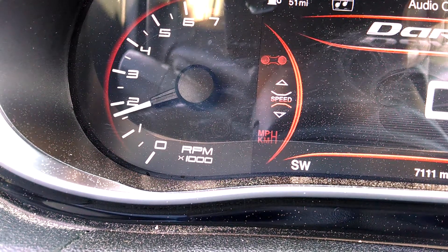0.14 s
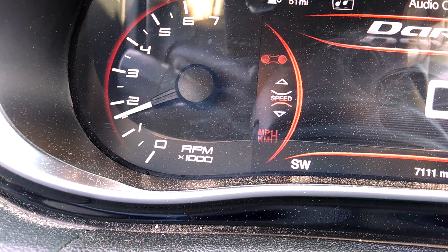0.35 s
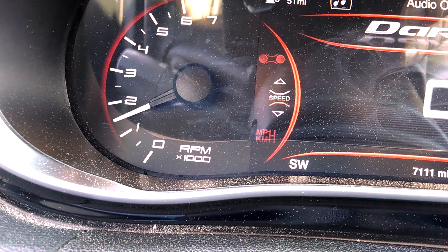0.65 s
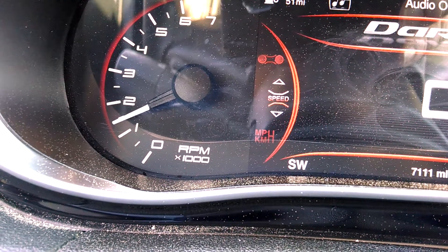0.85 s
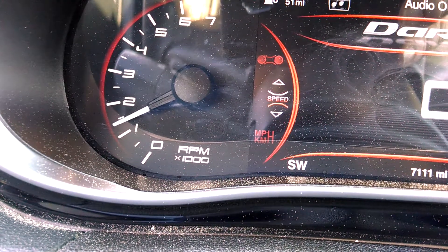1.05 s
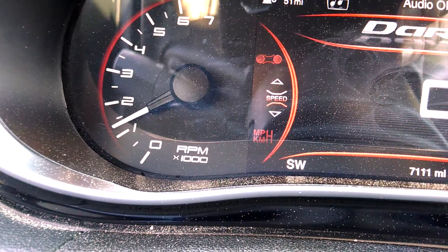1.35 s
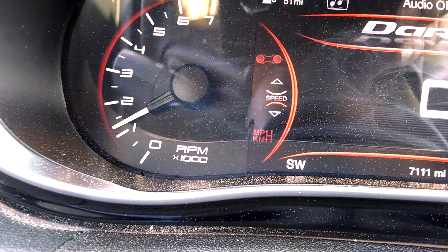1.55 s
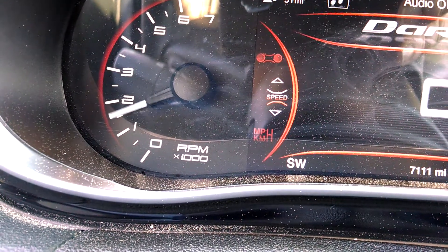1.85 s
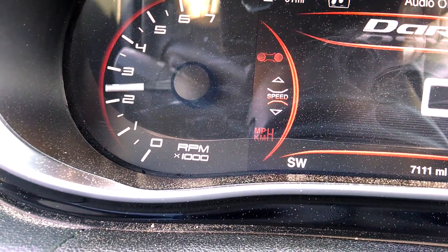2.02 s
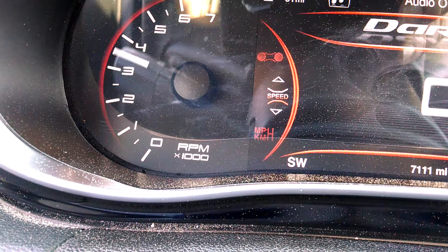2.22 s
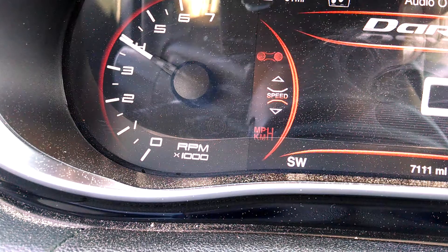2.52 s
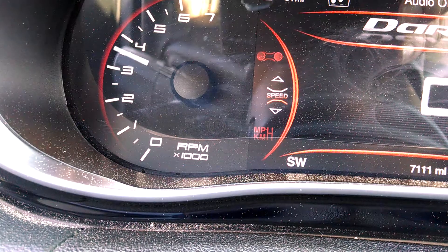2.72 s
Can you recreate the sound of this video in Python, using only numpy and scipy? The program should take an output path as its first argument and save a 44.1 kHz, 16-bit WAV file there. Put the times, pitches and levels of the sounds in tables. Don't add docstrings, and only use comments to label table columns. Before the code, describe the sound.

A four-cylinder car engine idles low, surges upward, and releases a sharp puff of turbo air

```python
import sys
import numpy as np
from scipy import signal
from scipy.fft import rfft, irfft, next_fast_len
from scipy.io import wavfile
from scipy.ndimage import map_coordinates

SR = 44100
rng = np.random.default_rng(int(sys.argv[2]) if len(sys.argv) > 2 else 0)


def volts_from_db(level):
    exponent = np.asarray(level, float) / 20
    return 10 ** exponent


def unload_audio(sound):
    columns = np.transpose(np.atleast_2d(sound))
    steps = np.round(np.clip(columns, -1, 1) * 32767)
    wavfile.write(sys.argv[1], SR, steps.astype(np.int16))


N = 127008
T_S = np.arange(N) / SR

# (frequency [Hz], level [dB])
PORT_DIFFERENCE = [(100, -29), (400, -11.5), (800, -6), (1500, 3), (3000, -1), (12000, 0)]
# (frequency [Hz], level [dB])
LEFT_TREBLE = [(5000, -0.13), (9000, -0.5), (14000, -3)]

# (frequency [Hz], level [dB])
BLOWER_SPECTRUM = [(1500, -8), (4000, 3), (9000, -1), (12000, -6), (15000, -15)]
# (frequency [Hz], level [dB])
INTAKE_SPECTRUM = [(1000, 6.5), (2500, 1), (4000, -3.5), (7000, -2), (9500, -7.5), (11500, -16.5),
                   (14500, -37), (15500, -22)]
# (frequency [Hz], level [dB])
HOUSING_SPECTRUM = [(600, -24), (760, 2.5), (850, 2.5), (950, -14), (1300, -33.5)]
TONE_HZ = [9775, 12986, 7130, 3135]
TONE_DB = [-64.5, -81, -80, -81]

# (frequency [Hz], level [dB])
RUMBLE_SPECTRUM = [(15, -83), (30, 8), (100, 4), (200, -4), (400, -14.5), (800, -28.5), (1500, -83)]
# (time [s], level [dB])
DRAUGHT_LEVEL = [(0.0, -25), (1.0, -21.5), (1.4, -19), (2.2, -19), (2.45, -17), (2.88, -21)]
# (time [s], peak [dB], frequency [Hz], sharpness [dB])
EDDIES = [(0.07, -5, 135, -4), (0.359, -4.5, 84, -0.5), (0.708, -13, 81, -8), (0.823, -7.5, 80.12, 2.5),
          (0.983, -23.5, 71.6, 16.5), (1.102, -7, 94.5, 4.5), (1.15, -6.5, 95, 3.5), (1.208, -3, 115.8, 4),
          (1.253, -12, 43.4, 5), (1.354, -5.5, 89, 6), (1.504, -5.5, 120, 3.5), (1.554, -10, 65.1, 5),
          (1.668, -21, 82.5, 6), (1.739, -10, 70, 5), (1.984, -11.5, 134, 13.5), (2.1, -9, 92.88, 11),
          (2.16, -15, 113, 7), (2.204, -30, 124, 3), (2.304, -11, 96.1, -14), (2.367, -8, 138.6, -15),
          (2.477, -12.5, 94, 13.5), (2.537, -10.5, 102.9, 10.5), (2.639, -30, 100.2, 3),
          (2.756, -14, 96.9, 17),
          (2.127, -3.5, 103.3, 3), (.14, -21, 130, 10), (.48, -10.5, 100, -1), (0.917, -24, 97, -10),
               (1.284, -14, 172, -13), (2.308, -10.5, 50.4, -7)]

# (time [s], level [dB])
SQUEAKS = [(0.456, -56), (.76, -55), (1.059, -55), (1.4, -56)]
# (time [s], level [dB], length [s])
CHIRPS = [(.725, -63, .016), (.79, -66, .015), (.903, -67, .012), (1.3, -68, .012), (1.47, -64, .012),
          (1.58, -65, .016), (1.765, -66, .016)]
# (time [s], level [dB])
TAPS = [
    (1.149, -25.5),
    (1.208, -32),
    (1.751, -27),
    (2.307, -17),
]
# (frequency [Hz], level [dB])
TAP_SPECTRUM = [(100, -29), (400, 12), (900, -9), (2000, -20), (3000, -45)]

# (time [s], peak [dB], rise [s], fall T60 [s])
PUFFS = [
    (2.305, -36.5, 0.0078, 0.12),
    (2.348, -46, 0.03, 2.83),
    (2.123, -52, 0.32, 2.31),
]
# (frequency [Hz], level [dB])
VALVE_SPECTRUM = [(1200, -3), (3000, -1.5), (5000, -5.5), (7300, 2), (9000, -2), (12000, -10), (13500, -18),
                  (15000, -26)]
# (time [s], length [s], frequency [Hz], width [Hz], level [dB])
FLUTTER = [(2.316, 0.0074, 3300, 199.9, -45.5), (2.358, 0.013, 1360, 200.1, -42),
           (2.36, 0.01, 1850, 89, -42), (2.367, 0.0064, 3250, 250, -47), (2.386, 0.0059, 3130, 300, -47.5)]

# (time [s], firing rate [Hz], boom [dB], boom share off-centre [ratio], load [dB], air flow [dB])
ENGINE = [(0, 52.66, -36, 0.46, -40, -61.5), (.35, 48.45, -23.5, 0.27, -39.5, -59),
          (.55, 45.6, -30, 0.14, -40.5, -59), (.8, 43.62, -22.5, .15, -37.5, -55),
          (1.1, 41.21, -31, 0.18, -37, -53.5), (1.25, 39.5, -33.5, 0.13, -41.5, -59.5),
          (1.52, 37.55, -29, 0.22, -39.5, -56), (1.64, 40.77, -33, .4, -34.5, -55.5),
          (1.76, 62.04, -32, 0.21, -22.5, -51), (1.87, 80.81, -19.5, 0.23, -20.5, -48),
          (1.98, 102.1, -20.5, 0.92, -23.5, -51), (2.06, 117.9, -40, .5, -21.5, -49),
          (2.17, 137.4, -21, 0.89, -22.5, -45.5), (2.32, 136.4, -25, 0.82, -22.5, -45.5),
          (2.43, 128.5, -36.5, 0.4, -29, -48), (2.55, 120.3, -23, 0.13, -30, -47.5),
          (2.74, 111, -34, 0.68, -31, -48), (2.88, 100.1, -19.5, 0.51, -27.5, -47)]
# (time [s], level [dB])
EXHAUST_LEVEL = [(1.45, -55), (1.62, -37.5), (1.77, -25.5), (1.9, -30.5), (2.08, -29), (2.2, -29),
                 (2.4, -36), (2.6, -36), (2.88, -36.5)]
# (time [s], change [dB], length [s])
LOAD_SWINGS = [
    (2.018, -7, .02),
    (2.105, 2.5, .02),
    (2.275, -5, .014),
    (2.335, -5, .008),
]
CYLINDER_SIZES = [1.55, 0.38, 1.01, 0.97]
# (multiple of firing rate [ratio], level over exhaust level [dB])
EXHAUST_ORDERS = [(2, -1), (2.5, -10), (3, -2), (3.5, -11), (4, -7), (4.5, -6), (5, -8), (6, -3)]
# (multiple of firing rate [ratio], level over load [dB])
WHINE_ORDERS = [(11.35, -1), (10.85, -8), (11.85, -8), (7.9, -11), (5, -7), (6, -10), (2, -9)]
# (frequency [Hz], width [Hz], level [dB])
PANELS = [(238, 118, -4.5), (395.6, 32, 8), (539, 116, -2), (608.6, 37.6, 5.5), (829, 60, -4)]
# (frequency [Hz], level [dB])
CABIN = [(60, -32), (130, 2), (300, -4.5), (650, 1), (920, -20), (1030, -16.5), (2000, -35.5), (3500, -84)]


def unit(x):
    return x / np.sqrt(np.mean(x ** 2) + 1e-20)


def along(points, hz):
    f, v = np.transpose(points)
    return np.interp(np.log(hz + 1), np.log(f + 1), v)


def curves(rows):
    s, *columns = np.transpose(rows)
    return [np.interp(T_S, s, column) for column in columns]


def wobble(rate_hz):
    knots = rng.standard_normal(int(N * rate_hz / SR) + 4)
    return map_coordinates(knots, [np.arange(N) * rate_hz / SR])


def bump(s, length_s):
    return np.exp(-.5 * ((T_S - s) / length_s) ** 2)


def filtered(x, response):
    m = next_fast_len(N + SR // 2)
    return irfft(rfft(x, m) * response(np.fft.rfftfreq(m, 1 / SR)), m)[..., :N]


def peaks(table, f):
    total = 0
    for k, (hz, width_hz, db) in enumerate(table):
        total = total + (-1) ** k * volts_from_db(db) * 1j * f * width_hz / (hz * hz - f * f + 1j * f * width_hz)
    return total


def ports(mid, apart):
    return np.array([mid + apart, mid - apart])


def spread(f):
    return np.array([np.ones_like(f), volts_from_db(along(PORT_DIFFERENCE, f))])


def cross(hz):
    inverse_delay_hz, fade_hz = 2641, 11000
    share = 0.67 * np.exp(-hz / fade_hz)
    z = share * np.exp(-2j * np.pi * hz / inverse_delay_hz)
    makeup = np.where(hz < inverse_delay_hz / 2, np.abs(1 - z), 1 + share)
    return np.array([1 - z, 1 + z]) / makeup


def hiss(spectrum):
    noise = rng.standard_normal((2, N))
    mid, apart = filtered(noise, lambda f: volts_from_db(along(spectrum, f)) * spread(f))
    return ports(mid, apart) / np.std(mid)


def air():
    *_, load_db, flow_db = curves(ENGINE)
    intake_db, blower_db, housing_db = 2, -70, 6
    tones = 0
    for hz, db in zip(TONE_HZ, TONE_DB):
        phase = 2 * np.pi * hz * T_S + 0.21 * wobble(11)
        tones = tones + np.sqrt(2) * volts_from_db(db + 0.85 * wobble(6.7)) * np.sin(phase)
    tones = tones * volts_from_db([[-1.2], [1.2]] - 0.28 * (load_db - load_db.min()))
    intake = volts_from_db(flow_db + intake_db + 0.45 * wobble(14)) * hiss(INTAKE_SPECTRUM)
    blower = volts_from_db(blower_db) * hiss(BLOWER_SPECTRUM)
    housing = volts_from_db(np.minimum(flow_db, -54) + housing_db + 2 * wobble(9)) * hiss(HOUSING_SPECTRUM)
    return intake + blower + housing + tones


def draught():
    lumps_db, left_db, eddy_db, eddy_cycles = 3, 1, -3.5, 0.52
    core_db, core_pitch = -10, 2.28
    lumps = volts_from_db(lumps_db * np.array([wobble(16), wobble(14)]))
    rumble = filtered(rng.standard_normal((2, N)), lambda f: volts_from_db(along(RUMBLE_SPECTRUM, f)))
    out = volts_from_db(curves(DRAUGHT_LEVEL)[0]) * unit(lumps * rumble) * volts_from_db([[left_db], [-left_db]])
    for s, db, hz, sharp_db in EDDIES:
        cycles = (T_S - s) * hz
        phase = rng.uniform(0, 2 * np.pi)
        for pitch, gain in [(1, 1), (core_pitch, volts_from_db(core_db + sharp_db))]:
            envelope = np.exp(-.5 * (pitch * cycles / eddy_cycles) ** 2)
            wave = np.cos(2 * np.pi * pitch * cycles + phase)
            out[0] += 2 * volts_from_db(db + eddy_db) * gain * envelope * wave
    return filtered(out, lambda f: 1 / np.abs(cross(np.minimum(f, 600))[1]))


def squeaks():
    start_hz, fall_hz_per_s, length_s = 2550, 6000, 0.018
    out = 0
    for s, db in SQUEAKS:
        late_s = T_S - s
        turns = (start_hz - fall_hz_per_s * late_s / 2) * late_s
        out = out + volts_from_db(db) * bump(s, length_s) * np.sin(2 * np.pi * turns)
    return out * volts_from_db([[3], [-9]])


def chirps():
    swell = sum(volts_from_db(db) * bump(s, length_s) for s, db, length_s in CHIRPS)
    return np.sqrt(2) * swell * np.sin(2 * np.pi * 7140 * T_S + 1.6 * wobble(90))


def taps():
    noise = unit(filtered(rng.standard_normal(N), lambda f: volts_from_db(along(TAP_SPECTRUM, f))))
    return sum(volts_from_db(db) * bump(s, 0.0015) for s, db in TAPS) * noise


def turbo():
    peak_s, length_s, peak_hz, rise_hz_per_s, level_db = 2.14, .06, 10000, 24000, -67
    late_s = T_S - peak_s
    turns = (peak_hz + rise_hz_per_s * late_s / 2) * late_s
    return np.sqrt(2) * volts_from_db(level_db) * bump(peak_s, length_s) * np.sin(2 * np.pi * turns + 2 * wobble(150))


def valve():
    envelope = 0
    for s, db, rise_s, t60_s in PUFFS:
        fall = volts_from_db(db - 60 * np.maximum(T_S - s - rise_s, 0) / t60_s)
        envelope = envelope + fall * np.clip((T_S - s) / rise_s, 0, 1)
    noise = rng.standard_normal((2, N))
    flutter = 0
    for s, length_s, *ring in FLUTTER:
        flutter = flutter + filtered(noise * bump(s, length_s), lambda f: 12 * peaks([ring], f))
    mid, apart = flutter
    return envelope * volts_from_db(0.76 * wobble(31.1)) * hiss(VALVE_SPECTRUM) + ports(mid, .5 * apart)


def engine_body(hz, turn):
    scatter_db, jitter_periods, gate, noise_db = 1.5, .014, .6, -4
    throb, lope = .25, .12
    echo_t60_s, panel_db = 0.28, 6
    at = np.searchsorted(turn, np.arange(1, int(turn[-1])))
    late, size = rng.standard_normal((2, len(at)))
    place = np.clip(at + jitter_periods * late * SR / hz[at], 0, N - 1).astype(int)
    pulses = np.zeros(N)
    pulses[place] = np.resize(CYLINDER_SIZES, len(at)) * volts_from_db(scatter_db * size)
    pulses = unit(pulses / np.sqrt(hz))
    noise = rng.standard_normal((2, N)) * np.exp(gate * np.cos(2 * np.pi * turn))
    decay = volts_from_db(-60 * np.arange(SR // 4) / SR / echo_t60_s)
    tails = rng.standard_normal((2, SR // 4)) * decay
    echoed = unit(signal.fftconvolve(pulses[None], tails, axes=1)[:, :N])
    drive = echoed + volts_from_db(noise_db) * unit(noise)
    drive = drive * np.exp(throb * np.cos(2 * np.pi * turn) + lope * np.cos(np.pi * turn))

    def response(f):
        return volts_from_db(along(CABIN, f)) * (1 + volts_from_db(panel_db) * peaks(PANELS, f)) * spread(f)

    mid, apart = filtered(drive, response)
    return ports(mid, apart) / np.std(mid)


def belt_whine(hz, turn):
    low_hz, high_hz = 38, 60
    present = np.clip(np.minimum((high_hz - hz) / 7, (hz - low_hz) / 4), 0, 1)
    out = 0
    for k, db in WHINE_ORDERS:
        out = out + volts_from_db(db + wobble(8)) * present * np.sin(2 * np.pi * k * turn + .25 * wobble(12))
    return out * volts_from_db([[.8], [-.8]])


def exhaust_strands(hz, turn):
    out = 0
    for k, db in EXHAUST_ORDERS:
        level_db = db + 3.2 * wobble(17) + np.minimum(along(CABIN, k * hz), 0)
        out = out + volts_from_db(level_db) * np.sin(2 * np.pi * k * turn + .55 * wobble(17))
    return out * volts_from_db([[.8], [-.8]])


def engine():
    hz, boom_db, share, load_db, _ = curves(ENGINE)
    turn = np.cumsum(hz) / SR
    swing_db = sum(db * bump(s, length_s) for s, db, length_s in LOAD_SWINGS)
    angle = 2 * np.pi * turn
    off_centre = share * np.sin(angle + 0.47) / np.abs(cross(hz)[1])
    boom = np.sqrt(2) * volts_from_db(boom_db) * ports(np.sin(angle), off_centre)
    loaded = engine_body(hz, turn) + belt_whine(hz, turn)
    loaded = volts_from_db(load_db + swing_db + 1.1 * wobble(14)) * loaded
    exhaust = volts_from_db(curves(EXHAUST_LEVEL)[0] + swing_db / 2) * exhaust_strands(hz, turn)
    return loaded + exhaust + boom


def scene():
    return air() + draught() + squeaks() + chirps() + taps() + turbo() + valve() + engine()


def roll_off(x):
    return signal.sosfilt(signal.butter(12, 15500, fs=SR, output="sos"), x)


def record(dry):
    top_hz = 15520
    mid, side = filtered(ports(dry[0], dry[1]) / 2, lambda f: cross(f) * (f < top_hz))
    mix = filtered(ports(mid, side), lambda f: volts_from_db(along(LEFT_TREBLE, f) * [[1], [-1]]))
    return roll_off(mix)


dry = scene()
out = record(dry)
unload_audio(out)
```